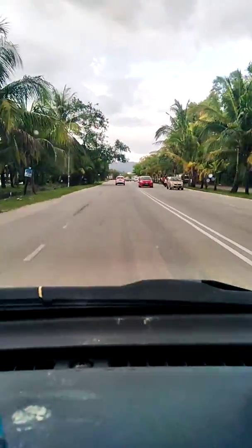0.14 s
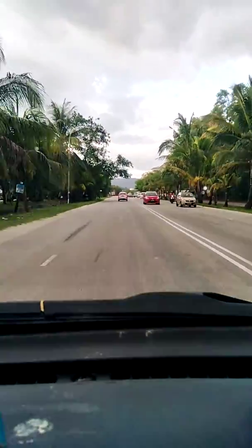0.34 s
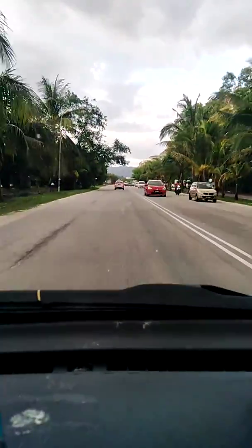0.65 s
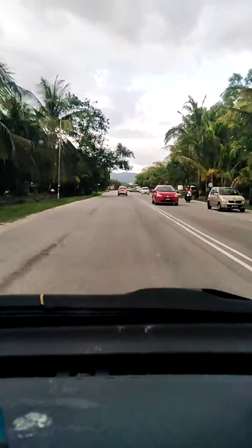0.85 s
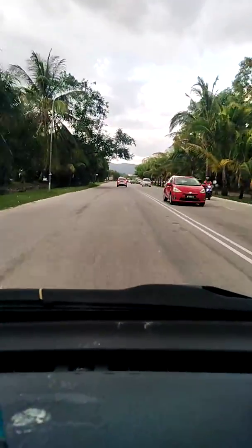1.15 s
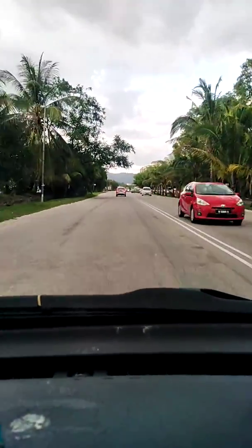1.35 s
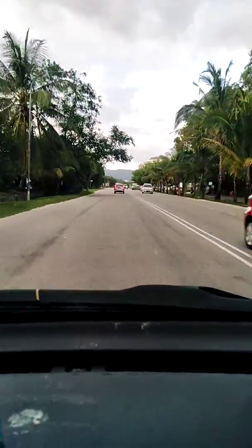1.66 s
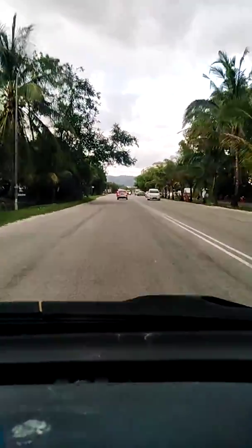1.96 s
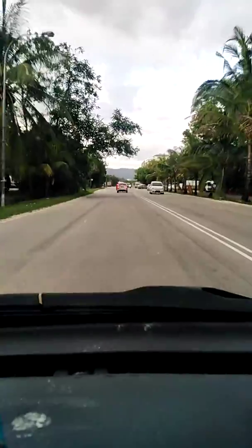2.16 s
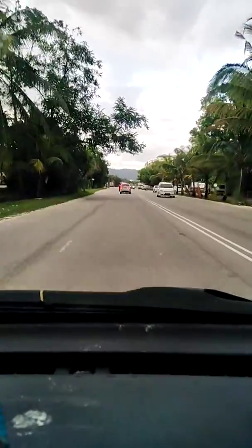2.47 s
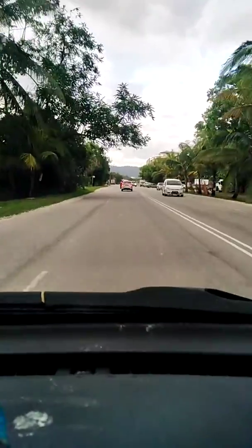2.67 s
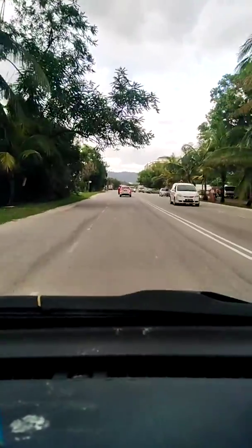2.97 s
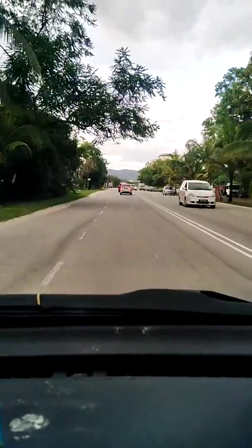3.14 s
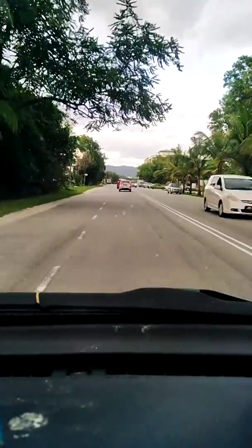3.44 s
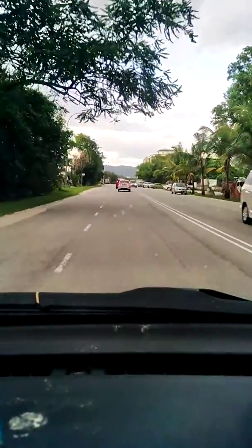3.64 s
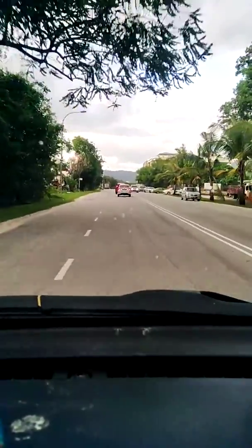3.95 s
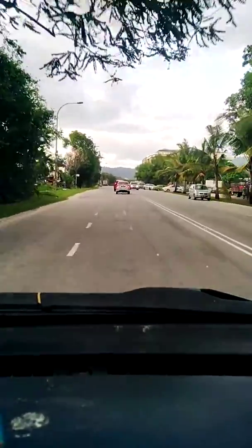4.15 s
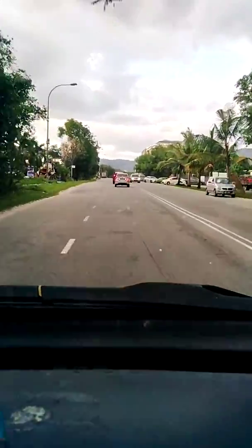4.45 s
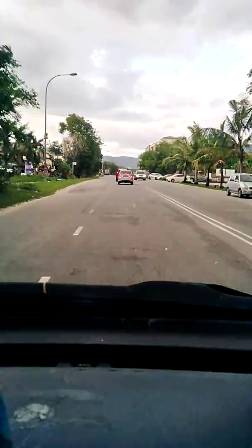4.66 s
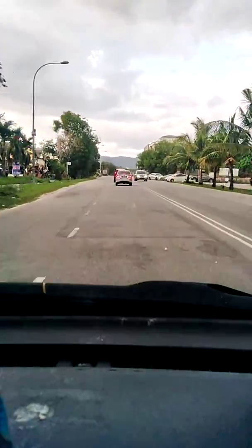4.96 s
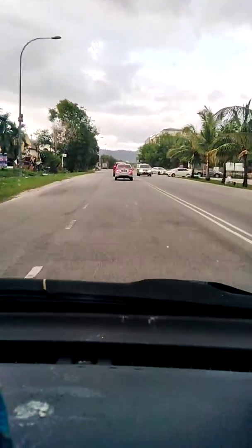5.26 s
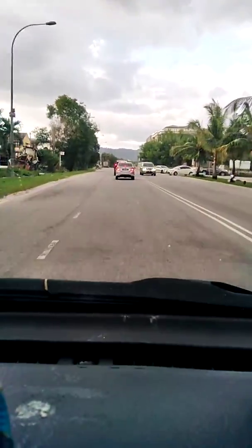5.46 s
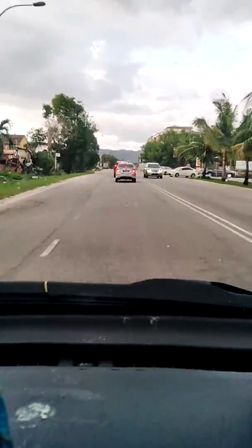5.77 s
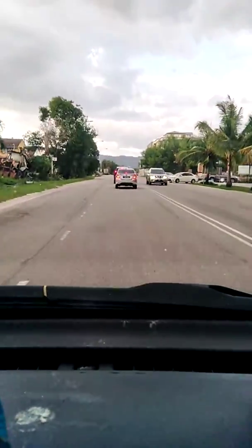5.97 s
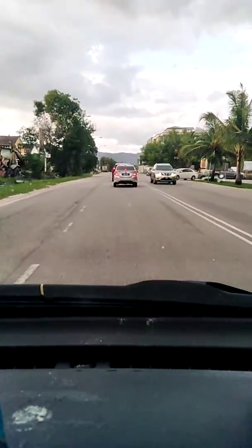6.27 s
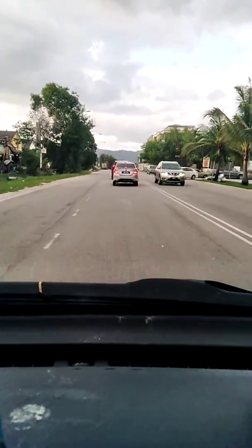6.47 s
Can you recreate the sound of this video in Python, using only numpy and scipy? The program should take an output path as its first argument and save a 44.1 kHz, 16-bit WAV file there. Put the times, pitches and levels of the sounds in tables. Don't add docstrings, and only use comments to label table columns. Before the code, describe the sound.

Heard from inside a moving car, with the microphone close to a dashboard vent. From 0 to about 1 second a deep, steady engine boom around 60 hertz swells over tyre rumble, then collapses as the throttle lifts and is gone by 1.5 seconds. Lumpy low road noise remains, with soft bump thumps especially from 2 to 5 seconds, easing toward the end. Turbulent vent air hisses constantly on the left, with hollow whistling tones and gusts strongest before 2.2 seconds; a louvre blade flutters softly until about 4.9. The right is sheltered and fainter. From 0.2 seconds an indicator relay alternates crisp tock and tick, roughly every 0.35 to 0.4 seconds, to the end at 6.6. Light panel rattles scatter throughout; trim knocks and cracks cluster near 1.9, with the hardest knock at 5.6.

```python
import sys
import numpy as np
from scipy import signal
from scipy.fft import rfft, irfft
from scipy.io import wavfile
from scipy.ndimage import uniform_filter1d

SR = 44100
rng = np.random.default_rng(int(sys.argv[2]) if len(sys.argv) > 2 else 0)


def bounce(signal):
    frames = np.transpose(np.atleast_2d(signal))
    limited = np.clip(frames, -1, 1)
    pcm = np.round(limited * 32767).astype(np.int16)
    wavfile.write(sys.argv[1], SR, pcm)


def boost_factor(decibels):
    exponent = np.asarray(decibels, float) / 20
    return 10 ** exponent


N = 291501


def evened(x):
    return x / np.sqrt(np.mean(x ** 2) + 1e-20)


def read(points, hz):
    f, value = np.transpose(points)
    return np.interp(np.log(hz + 1), np.log(f + 1), value, left=value[0] - 40, right=value[-1] - 40)


def curves(rows):
    s, *columns = np.transpose(rows)
    return [np.interp(np.arange(N) / SR, s, c) for c in columns]


def bursts(rows, rise):
    t, power = np.arange(0, N + 64, 64) / SR, 0
    for s, length, *db in rows:
        u = (t - s) / length
        fall_db = 11 * np.clip(u - rise, 0, 9)
        shape = np.clip(u / rise, 0, 1) * boost_factor(-fall_db)
        power = power + (boost_factor(np.array(db))[:, None] * shape) ** 2
    return [np.interp(np.arange(N) / SR, t, p) for p in power]


def add(mix, s, sound):
    part = mix[:, round(s * SR):][:, :sound.shape[1]]
    part += sound[:, :part.shape[1]]


def modes_db(modes, hz):
    power = sum(boost_factor(2 * db) / (1 + ((hz - f) / (w / 2)) ** 2) ** 2 for f, w, db in modes)
    return 10 * np.log10(power + 1e-12)


def noise(shape_db, size, patchy_db, flicker_db, likeness=None):
    hop = size // 4
    frames, hz = N // hop + 5, np.fft.rfftfreq(size, 1 / SR)
    patches, *parts = rng.standard_normal((frames, len(hz), 5 if likeness else 3)).T
    patches = uniform_filter1d(patches, size=8, axis=0)
    patches = evened(uniform_filter1d(patches, size=8, axis=1))
    flicker = evened(uniform_filter1d(rng.standard_normal(frames), size=3))
    z = np.array([parts[0] + 1j * parts[1]])
    if likeness:
        same = np.clip(np.interp(hz, *np.transpose(likeness)), 0, 1)[:, None]
        other = parts[2] + 1j * parts[3]
        z = np.array([z[0], same * z[0] + np.sqrt(1 - same ** 2) * other])
    z *= boost_factor(shape_db(hz)[:, None] + patchy_db * patches + flicker_db * flicker)
    return evened(signal.istft(z, nperseg=size, noverlap=size - hop)[1][:, :N])


def engine():
    # (time [s], firing rate [Hz], boom level [dB])
    firing = [
        (0.0, 59, -13.5),
        (0.06, 62.34, -11),
        (0.42, 61.67, -13.5),
        (0.52, 61.23, -12),
        (0.86, 62.18, -13.5),
        (1.03, 59.2, -21),
        (1.13, 58.07, -28.5),
        (1.29, 56.9, -26),
        (1.36, 53.4, -36),
        (1.44, 55.7, -24),
    ]
    # (time [s], level [dB])
    second_order = [(0.0, -31), (0.13, -20.5), (0.35, -21.5), (0.6, -18.5), (0.8, -24), (0.95, -25),
                    (1.05, -31), (1.2, -32), (1.3, -34), (1.44, -40)]
    # (time [s], third order [dB], fourth order [dB], exhaust hanger mode [dB])
    mounts = [(0.0, -31, -50, -50), (0.15, -48, -47, -31), (0.3, -43, -56, -41), (0.5, -38, -56, -33),
              (0.68, -48.5, -44.5, -36), (0.88, -36, -41, -31), (1.03, -32.5, -42, -47),
              (1.12, -37, -43, -46), (1.24, -30, -48, -55), (1.4, -53, -50, -55)]
    t = np.arange(N) / SR
    hz, first_db = curves(firing)
    turn = 2 * np.pi * np.cumsum(hz) / SR
    second_db = curves(second_order)[0]
    third_db, fourth_db, hanger_db = curves(mounts)
    boom = boost_factor(first_db) * np.cos(turn) + boost_factor(second_db) * np.cos(2 * turn + 0.06)
    boom += boost_factor(third_db) * np.cos(3 * turn + 3.8) + boost_factor(fourth_db) * np.cos(4 * turn)
    hanger_hz = 163.8
    boom += boost_factor(hanger_db) * np.cos(2 * np.pi * hanger_hz * t)
    uneven = 1 + .05 * evened(uniform_filter1d(rng.standard_normal(N), size=900))
    fade = np.clip((firing[-1][0] + 0.12 - t) / 0.23, 0, 1)
    return np.sqrt(2) * boom * uneven * fade * boost_factor([[.1], [-.1]])


def road():
    # (time [s], roughness [dB])
    surface = [(0.0, -33.5), (0.4, -24), (0.9, -28), (1.3, -28), (1.8, -38), (2.5, -34.5), (3.4, -43.5),
               (4.2, -35.5), (4.7, -40), (5.1, -39.5), (5.9, -45.5), (6.61, -50)]
    # (time [s], length [s], floor thump [dB], shell thump [dB])
    bumps = [(0.26, 0.17, -37, -43), (0.86, 0.11, -36, -24.5), (1.18, 0.16, -49, -26.5),
             (1.52, 0.24, -33, -50), (2.0, 0.063, -31.5, -53), (2.1, 0.09, -56, -49),
             (2.33, 0.15, -28.5, -35), (2.47, 0.1, -34, -45), (2.58, 0.12, -31, -33),
             (2.87, .08, -31.5, -45), (3.05, 0.13, -28.5, -36), (3.23, 0.3, -36, -35.5),
             (3.58, 0.27, -34, -36), (3.92, 0.35, -31, -40), (4.15, 0.3, -32, -38),
             (4.52, 0.18, -32.5, -57), (4.68, 0.15, -31.5, -35), (4.85, 0.06, -29.5, -29.5),
             (5.26, 0.082, -35, -49), (5.58, 0.12, -37.5, -47), (5.69, 0.09, -42, -42),
             (5.8, 0.22, -36, -46), (6.14, 0.28, -38.5, -44), (6.46, .08, -44, -48)]
    # (frequency [Hz], density [dB per Hz])
    rumble = [(20, -34), (45, -22), (58, -3.5), (68, 1), (82, -8), (100, -1), (122, -1.5), (150, -23)]
    # (frequency [Hz], density [dB per Hz])
    shell_drone = [(80, -67), (120, 2), (160, -1), (200, -3.5), (260, -16), (350, -18.5)]
    # (frequency [Hz], density [dB per Hz])
    tyre_roar = [(150, -17), (250, 1.5), (400, -9), (550, -7), (700, -14.5), (1200, -18.5), (2000, -22.5),
                 (3000, -28.5)]
    # (frequency [Hz], likeness [0-1])
    same_ports = [(30, 1), (100, 0.64), (200, 0.74), (350, 0.88), (700, 0.49), (2000, .1)]
    drone_share, roar_share = 0.53, 0.035
    load_db, lift_s, fall_db_per_s = -31, 0.96, 13

    rough_db = curves(surface)[0] + 40
    floor_thump, shell_thump = bursts(bumps, rise=0.12)
    load = boost_factor(load_db - fall_db_per_s * np.maximum(np.arange(N) / SR - lift_s, 0))
    floor = np.sqrt(boost_factor(rough_db - 42.0) ** 2 + floor_thump)
    shell = np.sqrt(boost_factor(drone_share * rough_db - 43.0) ** 2 + shell_thump + load ** 2)
    tyres = np.sqrt(boost_factor(roar_share * rough_db - 48.5) ** 2 + (boost_factor(-17.5) * load) ** 2)

    deep = noise(lambda f: read(rumble, f), 4096, patchy_db=1.5, flicker_db=2.0, likeness=same_ports)
    drone = noise(lambda f: read(shell_drone, f), 4096, patchy_db=1.5, flicker_db=-0.5, likeness=same_ports)
    roar = noise(lambda f: read(tyre_roar, f), 1024, patchy_db=2.0, flicker_db=0.5, likeness=same_ports)
    deep = boost_factor(4.0) * floor * deep
    upper = boost_factor(-1.35) * shell * drone + boost_factor(1.5) * tyres * roar
    return deep * boost_factor([[2.2], [-2.6]]) + upper * boost_factor([[.6], [-.6]])


def vent():
    # (time [s], flow [dB], buffeting [dB])
    air = [(0.0, -35, -63), (0.3, -34, -31), (1.0, -32.5, -31.5), (1.7, -34, -34.5), (2.1, -33.5, -38),
           (2.5, -33, -43), (3.3, -33.5, -33.5), (4.1, -33, -39.5), (4.8, -35.5, -41.5), (5.2, -34.5, -58),
           (5.6, -36.5, -49), (6.1, -36, -36.5), (6.61, -38.5, -81)]
    # (time [s], length [s], low duct [dB], throat [dB])
    gusts = [(0.0, 0.29, -38.5, -36), (0.28, 0.36, -36.5, -26.5), (0.7, 0.69, -41.5, -60),
             (0.92, 0.15, -37.5, -29.5), (1.37, 0.16, -41, -27.5), (1.56, 0.08, -37.5, -27),
             (1.84, 0.37, -32, -27.5), (2.88, 0.14, -42.5, -46), (3.08, .08, -57, -30),
             (3.25, 0.24, -68, -30), (3.82, 0.22, -51, -46), (4.02, .06, -58, -49), (4.19, 0.17, -45, -48),
             (4.75, 0.24, -44, -58), (5.605, 0.16, -37.5, -60), (6.13, 0.066, -65, -32.5),
             (6.56, 0.041, -55, -34)]
    # (time [s], level [dB])
    draught = [(0.0, -46), (0.3, -38.5), (1.4, -37), (1.7, -38), (2.2, -42), (2.5, -48), (2.68, -39),
               (3.3, -41), (4.3, -39.5), (5.1, -40.5), (5.25, -54), (5.38, -50), (5.48, -43.5), (6.2, -41),
               (6.45, -47), (6.6, -40)]
    # (frequency [Hz], width [Hz], level [dB])
    duct_modes = [(1778.2, 39.4, 7.5), (1850, 24, 6.5), (1933, 147, 0.5), (2362, 260, -5),
                  (4260, 110, -26.5), (4864, 360, -30.5), (5810, 500, -29.5)]
    # (frequency [Hz], width [Hz], level [dB])
    throat_modes = [(1385, 49, 8.5), (1510, 35, 2.5)]
    # (frequency [Hz], width [Hz], level [dB])
    gust_modes = [(837, 155, 1), (1010, 53, 1.5), (1095, 22, 3)]
    # (frequency [Hz], width [Hz], level [dB])
    pipe_modes = [(1574, 43, 2), (1311, 34, -0.5)]
    # (frequency [Hz], density [dB per Hz])
    hiss_shape = [(5000, -24), (5500, -36), (5780, -24), (5940, -15), (6100, -5), (6250, -1), (6850, -2.5),
                  (7600, 1.5), (8700, 5), (9300, 2), (10400, -8), (11200, -7), (12200, -16), (13300, -14),
                  (14000, -19), (14400, -23)]
    duct_share, calm_gust_db, gust_into_duct_db = 0.34, -17, -4.5
    notch_hz, notch_width_hz, notch_db = 2960, 130, -18

    def duct_db(f):
        return modes_db(duct_modes, f) + notch_db * np.exp(-((f - notch_hz) / notch_width_hz) ** 2)

    duct = noise(duct_db, 1024, patchy_db=0.53, flicker_db=-1.7)[0]
    throat = noise(lambda f: modes_db(throat_modes, f), 1024, patchy_db=2.2, flicker_db=.6)[0]
    gust = noise(lambda f: modes_db(gust_modes, f), 1024, patchy_db=2.6, flicker_db=.8)[0]
    pipe = noise(lambda f: modes_db(pipe_modes, f), 1024, patchy_db=3.5, flicker_db=-1.9)[0]
    hiss = noise(lambda f: read(hiss_shape, f), 512, patchy_db=1.07, flicker_db=0.44)[0]

    flow_db, buffet_db = curves(air)
    low_gust, throat_gust = bursts(gusts, rise=0.067)
    push = np.sqrt(low_gust * throat_gust)
    duct_level = np.sqrt(boost_factor(duct_share * (flow_db + 36.5) - 35.5) ** 2 + boost_factor(gust_into_duct_db) ** 2 * push)
    hum = boost_factor(5.5) * duct_level * duct
    hum += boost_factor(-4.0) * np.sqrt(boost_factor(buffet_db) ** 2 + throat_gust) * throat
    hum += boost_factor(0.5) * np.sqrt(boost_factor(buffet_db + calm_gust_db) ** 2 + low_gust) * gust
    hum += np.sqrt(boost_factor(curves(draught)[0]) ** 2 + boost_factor(-6.0) ** 2 * throat_gust) * pipe
    hiss = boost_factor(flow_db + 4.5) * np.sqrt(1 + boost_factor(28.0) ** 2 * push) * hiss
    around = boost_factor(-33) * np.roll(hum, shift=5)
    return np.array([hum + hiss, around])


def louvres():
    # (time [s], level [dB])
    edge_air = [(0.0, -77), (0.18, -56), (0.4, -55), (1.01, -47), (1.14, -56), (1.54, -49), (1.63, -57),
                (1.86, -53.5), (2.06, -50.5), (2.7, -57), (2.85, -53), (4.08, -54), (4.3, -60), (5.7, -60),
                (5.92, -51), (6.6, -65)]
    # (frequency [Hz], width [Hz], level [dB])
    edge_modes = [(3550, 105, -1), (3805, 124, -8), (3850, 210, -15)]
    edge = noise(lambda f: modes_db(edge_modes, f), 1024, patchy_db=4.0, flicker_db=0.4)[0]
    return boost_factor(curves(edge_air)[0] + 4.0) * edge * boost_factor([[0], [-40]])


def swirl():
    # (time [s], strength [dB])
    eddies = [(0.0, -60), (0.29, -53), (0.36, -46), (0.5, -52.5), (1.14, -53), (1.2, -56), (1.43, -49.5),
              (1.76, -55.5), (1.87, -45), (2.11, -50.5), (3.77, -52.5), (4.06, -50.5), (4.72, -53.5),
              (4.98, -56.5), (5.13, -48.5), (5.53, -59.5), (6.17, -51), (6.6, -54.5)]
    # (frequency [Hz], width [Hz], level [dB])
    upper_duct = [(2733, 38, 0.5), (3293, 160, -4.5), (3130, 80, -12)]
    spill_mode = [(2960, 200, 0)]  # (frequency [Hz], width [Hz], level [dB])
    spill_db, spill_share = -74, 1.8
    strength_db = curves(eddies)[0]
    ringing = noise(lambda f: modes_db(upper_duct, f), 1024, patchy_db=1.5, flicker_db=-0.86)[0]
    spill = noise(lambda f: modes_db(spill_mode, f), 1024, patchy_db=3, flicker_db=2)[0]
    air = boost_factor(strength_db + 9.0) * ringing + boost_factor(spill_db + spill_share * (strength_db + 59)) * spill
    return air * boost_factor([[0], [-38]])


def cabin():
    # (frequency [Hz], density [dB per Hz])
    cabin_air = [(600, 18), (880, -60), (1200, -29), (1850, -10), (2300, -23), (3300, 1), (3750, -7),
                 (4300, -3), (5200, -6), (5900, -1), (6700, -5), (7600, 0), (8800, -13), (11000, -12),
                 (11800, -8), (14300, -8)]
    air = boost_factor(-54) * noise(lambda f: read(cabin_air, f), 2048, patchy_db=2.5, flicker_db=.8)[0]
    return np.array([0 * air, air])


def rattle():
    # (time [s], level [dB], ring [Hz])
    firm = [(0.091, -29, 537), (0.151, -30, 1830), (0.318, -41, 883), (0.653, -39, 850.5),
            (0.729, -38, 795), (0.76, -31, 1870), (0.888, -33, 1810), (0.94, -37, 874), (1.169, -40, 915),
            (1.204, -31, 1810), (1.375, -34, 521), (1.48, -37, 2054), (2.055, -43, 1780),
            (2.268, -38, 1830), (2.619, -37, 1855), (2.972, -37.5, 897), (3.288, -30.5, 550),
            (3.58, -38, 1824), (3.737, -46, 903), (4.569, -41, 1820), (4.758, -40, 844),
            (5.262, -28.5, 2014), (5.611, -36, 1785), (6.049, -35, 1875), (6.27, -32, 1740)]
    panel_hz = (880, 1830, 1530, 890, 1950, 2500)
    light_db, spread_db = -44, 4
    out, t = np.zeros((2, N)), np.arange(6000) / SR
    when, strength, pitch = rng.random((60, 3)).T
    light_hz = np.resize(panel_hz, len(when)) * (.97 + .06 * pitch)
    light = zip(when * N / SR, light_db + spread_db * (2 * strength - 1), light_hz)
    for s, db, hz in list(firm) + list(light):
        shake = 1 + .5 * evened(uniform_filter1d(rng.standard_normal(len(t)), size=400))
        swell = (1 - np.exp(-t / .006)) * boost_factor(-60 * t / .17)
        ring = shake * swell * np.sin(2 * np.pi * hz * t)
        add(out, s, boost_factor(db + 2.5) * ring * boost_factor([[-3], [0]]))
    return out


def relay():
    # (frequency [Hz], width [Hz], level [dB])
    tock = [(4306, 170, -7), (5950, 200, -12), (6330, 250, -6), (7116, 150, -7), (7665, 350, 0),
            (8150, 350, -2), (9453, 200, -16), (10400, 300, -15), (12300, 1500, -23), (13727, 500, -25)]
    # (frequency [Hz], width [Hz], level [dB])
    tick = [(3822, 150, -8), (4349, 250, -4), (5100, 300, -7), (5501, 300, -3), (5900, 250, -4),
            (7342, 350, -1), (7945, 300, -2), (8570, 120, -11), (10034, 250, -4), (10938, 250, -9),
            (11498, 250, -12), (12900, 2000, -22)]
    # (frequency [Hz], level [dB])
    left_port = [(3000, 5), (4000, 5), (4350, -2), (4650, 5), (5000, 2), (5220, -10), (5450, -3), (5800, 5),
                 (8000, 6), (9000, 17), (11000, 4), (14400, 11)]
    cycle_s, first_tock_s, lamp_off_s = .7274, .1765, .385
    tock_db, tick_db = -29.5, -31
    out, t, hz = np.zeros((2, N)), np.arange(8192) / SR, np.fft.rfftfreq(8192, 1 / SR)
    landing = np.clip(t / .002, 0, 1) * np.exp(-np.maximum(t - .011, 0) / .004)
    tail = boost_factor(-9 - 60 * t / .45) * np.clip(t / .012, 0, 1)
    ports = boost_factor([read(left_port, hz), 0 * hz])
    for k in range(2 * round(N / SR / cycle_s)):
        cycle, closing = divmod(k, 2)
        s = first_tock_s + cycle * cycle_s + closing * lamp_off_s
        db = (tock_db, tick_db)[closing] - 5 + 1.9 * rng.standard_normal()
        case = boost_factor(modes_db((tock, tick)[closing], hz)) + boost_factor(-37) * (hz > 3300)
        click = irfft(rfft(rng.standard_normal((2, len(t)))) * case * ports)
        add(out, s - .004, boost_factor(db) * click / click[1].std() * (landing + tail))
    return out


def thuds():
    # (time [s], length [s], level [dB], mode [Hz])
    flexes = [(.21, .07, -37, 295), (.39, .12, -42, 365), (.5, .08, -41, 258), (.85, .06, -37, 285),
              (1.08, .06, -34, 285), (1.09, .08, -34, 232), (1.155, .04, -40, 375), (1.195, .04, -40, 345),
              (1.37, .04, -41, 320), (2.33, .06, -44, 320), (6.31, .07, -40, 235)]
    out = np.zeros((2, N))
    for s, length, db, hz in flexes:
        t = np.arange(0, length, 1 / SR)
        thud = np.sin(np.pi * t / length) ** 2 * np.sin(2 * np.pi * hz * t)
        add(out, s, boost_factor(db + 3) * thud * boost_factor([[1], [-1]]))
    return out


def knocks():
    # (time [s], level [dB], ring [Hz], t60 [s], left over right [dB])
    struck = [(0.343, -31, 366, 0.14, 16), (0.425, -28, 363, 0.14, 27), (0.683, -49, 290, 0.078, 11),
              (0.813, -32, 823, 0.17, 19), (0.918, -31, 325.7, 0.044, 7), (1.098, -41, 296.4, 0.049, 7),
              (1.714, -33.5, 860, 0.11, 22), (1.844, -31.5, 965, 0.087, 33), (1.872, -31, 840, 0.09, 33),
              (1.905, -28, 870, .08, 25), (1.965, -32, 833, 0.074, 21), (2.611, -31.5, 358, 0.093, 12),
              (3.263, -38, 994, 0.12, 28), (4.214, -29, 376, 0.078, 3), (4.754, -31.5, 783, 0.11, 28),
              (5.286, -37.5, 370, 0.11, 13), (5.611, -19.5, 695, 0.04, 29), (5.629, -23.5, 745, 0.04, 29),
              (5.603, -31, 930, .03, 27), (5.641, -38, 680, 0.05, 25), (5.655, -31, 705, 0.055, 25),
              (5.662, -35, 866, 0.068, 25), (5.69, -48, 820, .05, 25), (5.72, -38, 890, .05, 25)]
    # (time [s], level [dB])
    snaps = [(0.345, -39), (1.845, -46), (1.8712, -36), (1.8735, -37), (1.882, -50), (1.896, -48),
             (1.906, -47), (1.93, -52), (1.958, -51), (1.99, -52), (2.045, -51), (2.07, -53), (5.873, -56)]
    out, t = np.zeros((2, N)), np.arange(8000) / SR
    for s, db, hz, t60, pan_db in struck:
        ring = np.sin(2 * np.pi * hz * t) + .6 * np.sin(2 * np.pi * 2.25 * hz * t)
        ring *= boost_factor(db - 60 * t / max(t60, .01)) * (1 - np.exp(-t / .001))
        right = boost_factor(-pan_db)
        add(out, s, 2 * ring * np.array([[1], [right]]) / (1 + right))
    band = signal.butter(1, [4800, 9500], 'band', fs=SR)
    for s, db in snaps:
        grit = signal.lfilter(*band, rng.standard_normal(len(t)))
        crack = grit * (np.exp(-t / .001) + boost_factor(-25 - 60 * t / .7))
        crack *= signal.windows.tukey(len(t), .002)
        add(out, s, boost_factor(db + 23) * crack * boost_factor([[0], [-32]]))
    return out


def flaps():
    # (time [s], level [dB], mode [Hz])
    blade = [(.44, -33, 1100), (.56, -42, 1100), (.68, -30, 797), (.75, -33, 1028), (.85, -30, 1121),
             (.92, -29, 1155), (.93, -26, 866), (1.28, -39, 976), (1.34, -35, 1141), (1.385, -29, 864),
             (1.6, -32, 848), (2.15, -30, 832), (2.99, -29, 1434), (3.11, -36.5, 834), (3.24, -30, 1370),
             (3.35, -31, 1363), (3.37, -40, 790), (3.53, -29, 1410), (3.75, -36.5, 837), (3.81, -26, 1434),
             (3.83, -38, 1000), (3.88, -36, 834), (4.02, -26, 1424), (4.19, -36, 1004), (4.24, -42, 780),
             (4.27, -28, 1345), (4.43, -30, 1434), (4.49, -40, 1004), (.52, -50, 950), (.57, -34, 877),
             (.96, -30, 784), (1.04, -37, 555), (1.05, -36, 1000), (1.08, -33, 873), (1.19, -41.5, 1037),
             (1.2, -42, 828), (1.87, -31, 914), (2.05, -51, 1020), (2.3, -35, 836), (2.47, -41, 750),
             (2.58, -47, 830), (2.67, -35, 820), (2.81, -34, 797), (2.87, -38, 837), (2.91, -49, 1040),
             (3.46, -51, 805), (3.52, -48, 894), (3.95, -41, 1020), (4.02, -41, 950), (4.275, -48, 802),
             (4.78, -27, 820), (4.85, -38, 820), (4.885, -38, 824)]
    flap_s = 0.046
    t, out = np.arange(0, flap_s, 1 / SR), np.zeros((2, N))
    swing = np.sin(np.pi * (t / flap_s) ** 0.9) ** 2
    for (s, db, hz), bend in zip(blade, rng.standard_normal(len(blade))):
        blip = swing * np.sin(2 * np.pi * hz * t * (1 + .02 * bend * t / flap_s))
        add(out, s, boost_factor(db - 1) * blip * boost_factor([[0], [-26]]))
    return out


def scene():
    air = vent() + louvres() + swirl() + cabin()
    trim = rattle() + thuds() + knocks() + flaps()
    return engine() + road() + air + relay() + trim


def gate(x):
    # (frequency [Hz], level [dB per bin])
    quiet = [(1000, -96), (2200, -82), (3000, -80.5), (5600, -80), (8000, -81.5), (9000, -88), (11000, -88),
             (11800, -89), (14500, -90)]
    wide_from_hz = 8000
    follows = 0.11
    hz, _, z = signal.stft(x, SR, nperseg=2048, noverlap=1536)
    hz = hz[:1024]
    bands = (abs(z[:, :1024]) ** 2).reshape(2, 256, 4, -1).mean(axis=2)
    bands = abs(uniform_filter1d(bands, size=4, axis=2))
    waver_db = 3.5 * evened(uniform_filter1d(rng.standard_normal(bands.shape), size=8, axis=2))
    narrow_db = 10 * np.log10(bands + 1e-20) + waver_db
    broad = bands.reshape(2, 64, 4, -1).mean(axis=2)
    broad_db = np.repeat(10 * np.log10(broad + 1e-20) + waver_db[:, ::4], repeats=4, axis=1)
    wide = (hz[::4] > wide_from_hz)[:, None]
    level_db = np.repeat(np.where(wide, broad_db, narrow_db), repeats=4, axis=1)
    over_db = level_db - read(quiet, hz)[:, None] - np.array([6, 0])[:, None, None]
    loud_db = 10 * np.log10(uniform_filter1d((abs(z) ** 2).sum(axis=(0, 1)), size=20) + 1e-12)
    over_db = over_db - follows * (loud_db - np.median(loud_db))
    keep = np.pad(np.clip(over_db, .001, 1), ((0, 0), (0, 1), (0, 0)))
    return signal.istft(z * keep, SR, nperseg=2048, noverlap=1536)[1][:, :N]


def top_cut(x):
    return signal.sosfilt(signal.butter(12, 14440, fs=SR, output="sos"), x)


def record(dry):
    low_pass = signal.firwin(511, 14250, window=("kaiser", 9), fs=SR)
    cut = signal.oaconvolve(gate(dry), low_pass[None], "same")
    return top_cut(cut)


dry = scene()
out = record(dry)
bounce(out)
```